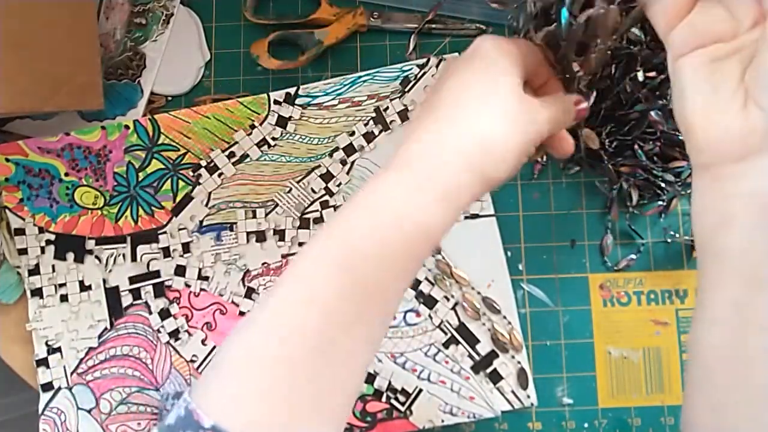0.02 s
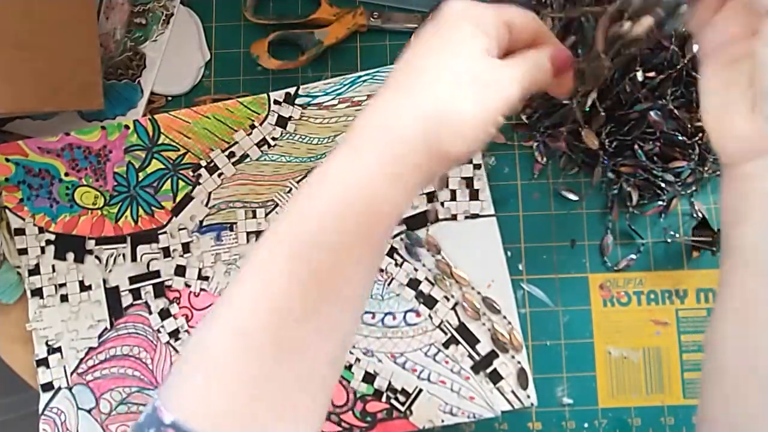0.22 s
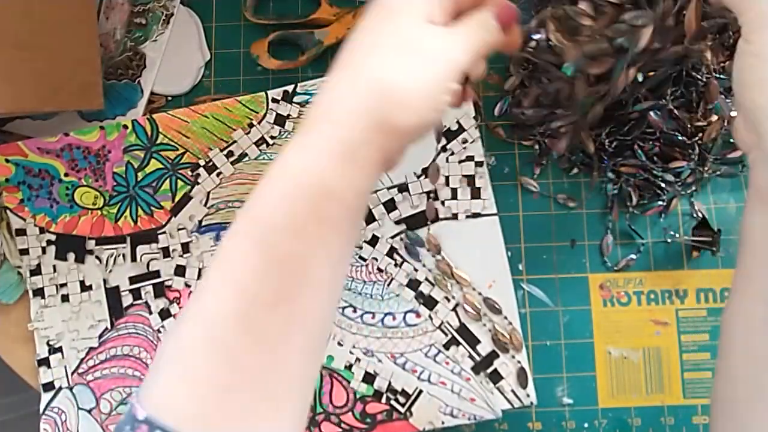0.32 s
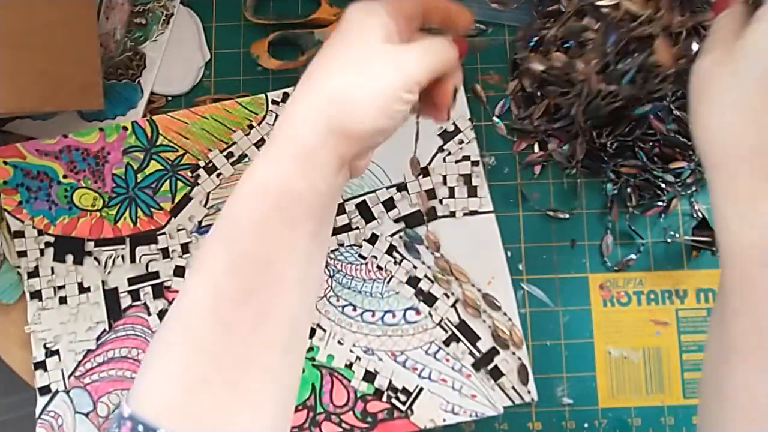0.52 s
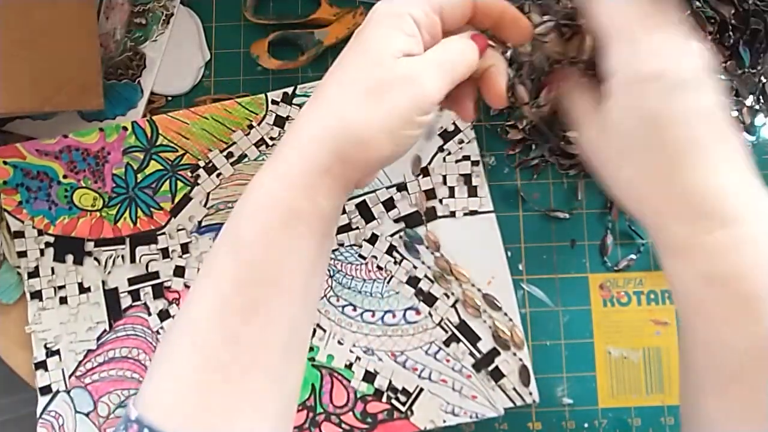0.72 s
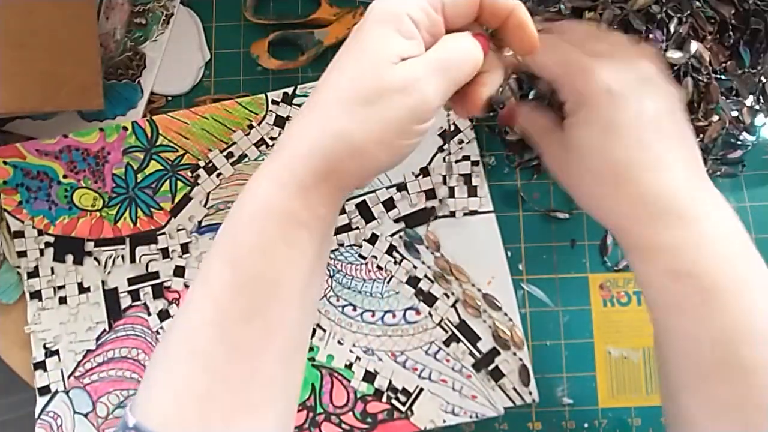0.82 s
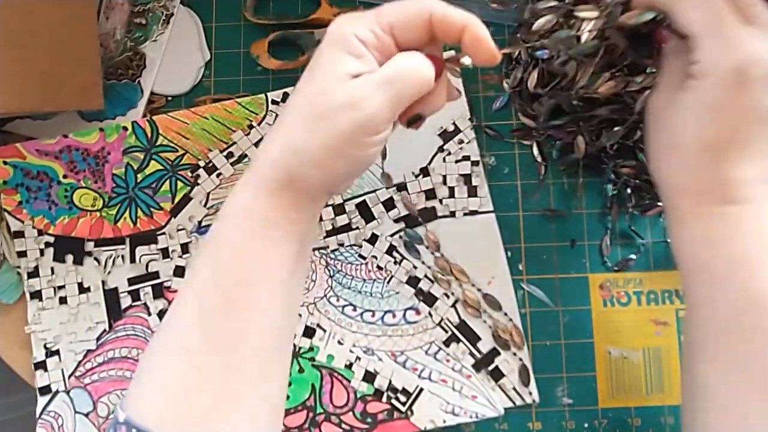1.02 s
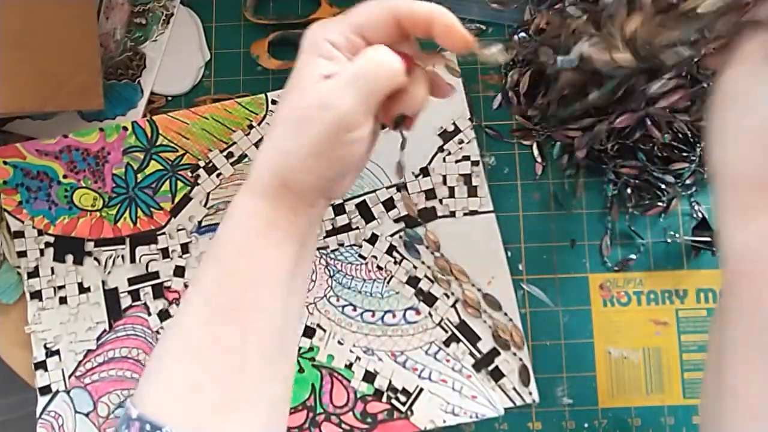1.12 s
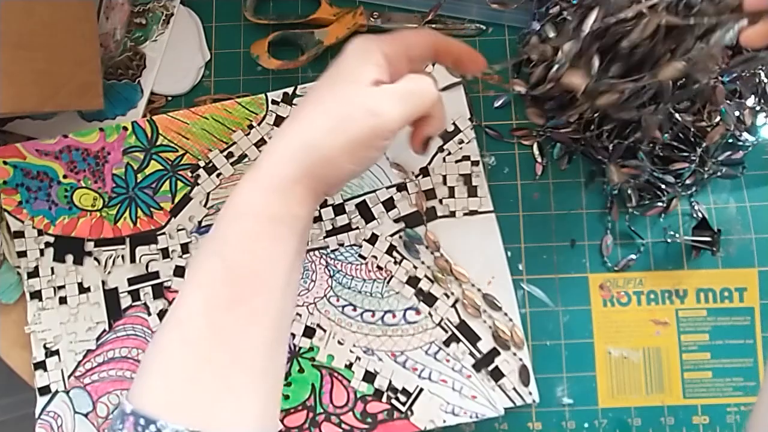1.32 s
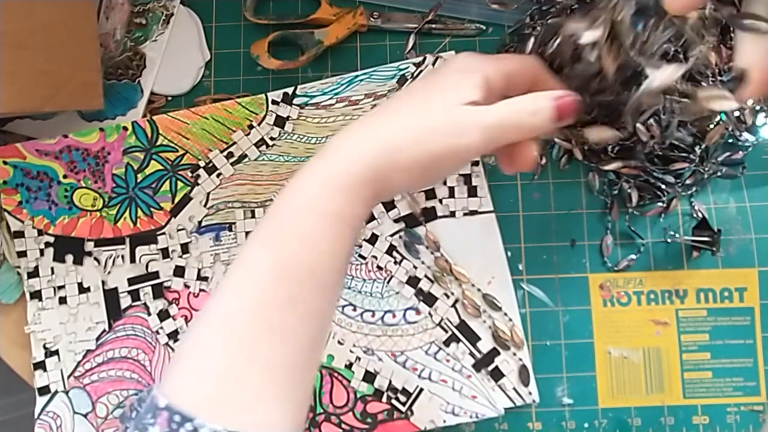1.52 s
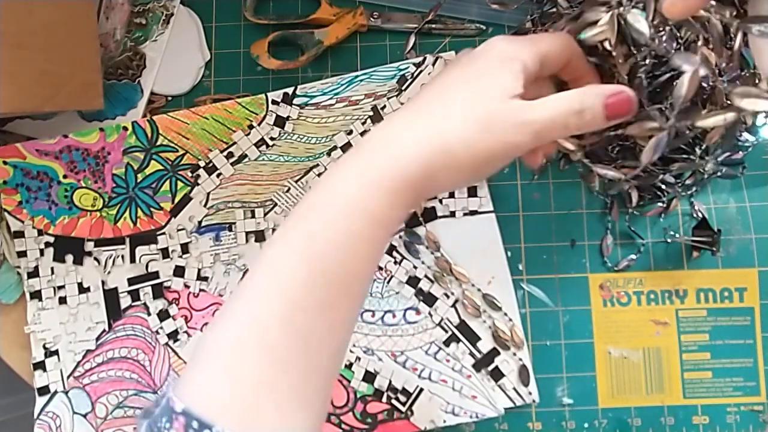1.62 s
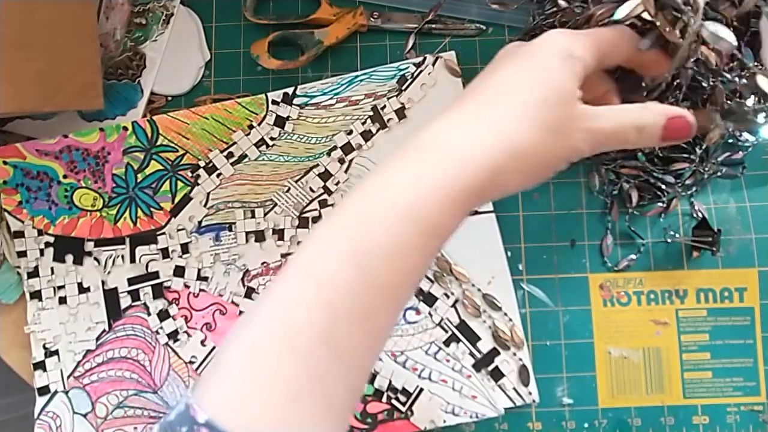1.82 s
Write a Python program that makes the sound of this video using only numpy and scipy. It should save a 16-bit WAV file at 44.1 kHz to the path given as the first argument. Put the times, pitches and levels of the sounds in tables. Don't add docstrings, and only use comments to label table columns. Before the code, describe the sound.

Bright, dry rattling of many tiny beads, swelling as hands stir them on a craft mat

```python
import sys
import numpy as np
from scipy import signal
from scipy.fft import rfft, irfft
from scipy.io import wavfile

SR = 44100
rng = np.random.default_rng(int(sys.argv[2]) if len(sys.argv) > 2 else 0)


def generate_wav(signal):
    frames = np.transpose(np.atleast_2d(signal))
    scaled = np.clip(frames, -1, 1) * 32767
    pcm = np.round(scaled).astype(np.int16)
    wavfile.write(sys.argv[1], SR, pcm)


def volts_from_decibels(level):
    exponent = np.asarray(level, float) / 20
    return 10 ** exponent


N = 81585
TIME_S, BIN_HZ = np.arange(N) / SR, np.arange(N // 2 + 1) * SR / N

LAG_S, LAG_SPREAD_S, PAN_DB, PAN_SPREAD_DB = 0.00021, .00008, -2, -0.5
LEAD = 40


def rms_one(x):
    return x / np.sqrt(np.mean(x ** 2) + 1e-20)


def in_time(rows):
    s, *columns = np.transpose(rows)
    return [np.interp(TIME_S, s, column) for column in columns]


def colour(x, points):
    f, db = np.transpose(points)
    log_hz = np.log(np.maximum(BIN_HZ, 5))
    gain_db = np.interp(log_hz, np.log(f), db, left=db[0] - 44)
    return irfft(rfft(x) * volts_from_decibels(gain_db), N)


def high(x, hz):
    return signal.sosfilt(signal.butter(4, hz, "high", fs=SR, output="sos"), x)


def drift(rate):
    r = np.exp(-2 * np.pi * rate / SR)
    noise = rng.standard_normal(N + SR)
    return rms_one(signal.lfilter([1], [1, -2 * r, r * r], noise)[SR:])


def ring(clicks, hz, t60):
    r = volts_from_decibels(-60 / (t60 * SR))
    w = 2 * np.pi * min(hz, 18000) / SR
    return signal.lfilter([0, np.sin(w)], [1, -2 * r * np.cos(w), r * r], clicks + 1e-18)


def placed(s, strength, where, size=N):
    out = np.zeros((2, size))
    for side, sign in enumerate((1, -1)):
        lag = sign * (LAG_S + LAG_SPREAD_S * where[:, 0]) / 2
        gain = strength * volts_from_decibels(sign * (PAN_DB + PAN_SPREAD_DB * where[:, 1]) / 2)
        at = np.clip((s + lag) * SR, 0, size - 2)
        part = at % 1
        np.add.at(out[side], at.astype(int), gain * (1 - part))
        np.add.at(out[side], at.astype(int) + 1, gain * part)
    return out


def grains(per_s, spread_db, clump_db, low_hz, high_hz, cycles, count):
    uneven_db = spread_db * np.minimum(rng.exponential(1, N), 4.0)
    clumps_db = clump_db * (.25 * drift(40) + drift(120))
    sizes = volts_from_decibels(uneven_db + clumps_db) * rng.choice([-1, 1], N)
    born = rng.random(N) < per_s / SR
    dealt = rng.integers(0, count, N)
    where = rng.standard_normal((N, 2))
    out = 0
    for k, hz in enumerate(np.geomspace(low_hz, high_hz, count)):
        at = np.flatnonzero(born & (dealt == k))
        clicks = placed(at / SR, sizes[at], where[at])
        gain = np.sqrt(hz) / np.sin(2 * np.pi * hz / SR)
        out = out + gain * ring(clicks, hz, cycles / hz) + 2.62 * np.sqrt(high_hz) * clicks
    return out


def lay(out, s, part, db):
    start = int(s * SR) - LEAD
    crest = np.sqrt(np.mean(np.max(part ** 2, axis=1)))
    return np.pad(part * volts_from_decibels(db) / crest, ((0, 0), (start, N)))[:, :N] + out


def room_tone():
    # (frequency [Hz], density [dB per Hz])
    hum_and_hiss = [(25, -15), (48, -3.5), (100, -0.5), (130, -2), (600, -9.5), (900, -25.5), (3000, -7),
                    (15900, -4.5)]
    mid, side = rng.standard_normal((2, N))
    return volts_from_decibels(-66) * rms_one(colour(mid + .5 * side * [[1], [-1]], hum_and_hiss))


def rattle():
    # (time [s], level [dB])
    stirring = [(0, -49), (.04, -77), (.12, -50), (.135, -51), (.225, -40), (.36, -51), (.45, -39.5),
                (.61, -50), (.70, -43), (.775, -29), (.915, -44), (.96, -31), (1.07, -36), (1.255, -41),
                (1.33, -35), (1.635, -44.5), (1.74, -47), (1.85, -57)]
    # (time [s], change [dB], half length [s])
    slips = [(0.02, -3.5, 0.018), (0.075, -1, 0.02), (0.117, -13, 0.0072), (0.308, 5, 0.015),
             (0.38, -1.5, 0.03), (0.461, 4.5, 0.006), (0.481, -5, 0.009), (0.603, -10, 0.011),
             (0.92, 3.5, 0.026), (0.99, 1, 0.034), (1.08, -4, 0.0068), (1.123, 2, 0.044),
             (1.189, 11.5, 0.0028), (1.224, 7.5, 0.0069), (1.243, -2.8, 0.013), (1.329, 3, 0.037),
             (1.533, -4.5, 0.023), (1.571, 5.5, 0.0063), (1.635, -8.5, 0.014), (1.653, 2.5, 0.006),
             (1.766, 5.5, 0.013), (1.791, -15, 0.009)]
    # (time [s], extra balance [dB])
    hands = [
        (0, 1),
        (.25, -2.3),
        (.44, -1.5),
        (.55, 1),
        (.95, -1.5),
        (1.22, -1.3),
        (1.6, .5),
        (1.85, -1),
    ]
    # (frequency [Hz], density [dB per Hz])
    bead_colour = [(2500, -31), (3600, -33), (5200, -27.5), (6500, -12), (10000, -3), (11500, -3.5),
                   (12500, -5), (15900, -8)]
    top_hz, top_follows = 11650, 0.34

    stir_db, = in_time(stirring)
    stir_db = stir_db + sum(db * np.exp(-((TIME_S - s) / half) ** 2) for s, db, half in slips)
    lean_db = in_time(hands)[0] * [[.5], [-.5]]
    ticks = grains(7000, 2.9, 1.4, 3770, 17200, cycles=20, count=90)
    ticks = rms_one(colour(ticks, bead_colour))
    top = irfft(rfft(ticks) * (BIN_HZ > top_hz), N)
    top_gain = volts_from_decibels(top_follows * (stir_db - stir_db.max()))
    return volts_from_decibels(stir_db + lean_db + 3.5) * (ticks + top * (top_gain - 1))


def mat():
    # (time [s], hollow ring [dB], rustle above it [dB])
    dragging = [(0.0, -70.5, 2), (0.082, -84.5, 13.5), (0.2, -56.5, 1), (0.37, -76, 15.5), (0.39, -66, 9.5),
                (0.766, -72.5, 11.5), (0.854, -59.5, 4.5), (0.906, -70.5, 11), (1.01, -61.5, 4),
                (1.06, -71.5, 12.5), (1.23, -64.5, 6.5), (1.256, -71.5, 16), (1.396, -65.5, 12),
                (1.648, -75, 7), (1.71, -56, -1.5), (1.756, -83.5, 21.5), (1.802, -72.5, 12),
                (1.85, -84.5, 15)]
    # (frequency [Hz], density [dB per Hz])
    rustle_colour = [(500, -25.5), (640, -26), (1150, -14), (1700, 0), (2300, 2.5), (5000, 8.5),
                     (7000, -10)]
    # (time [s], peak [dB])
    thump_hits = [(0.195, -51), (0.39, -50.5), (0.499, -56), (0.925, -54), (0.983, -53), (1.001, -57.5),
                  (1.112, -56), (1.188, -54), (1.211, -48), (1.225, -52.5), (1.403, -46.5), (1.473, -49),
                  (1.602, -53.5), (1.69, -52), (1.706, -48.5), (1.79, -61)]
    # (frequency [Hz], level [dB], t60 [s])
    table_body = [(398, -17, 0.04), (646, -8, 0.0096)]
    hollow_modes_hz, hollow_t60_s = (860, 925, 1010), .038

    hollow_db, rustle_db = in_time(dragging)
    rustle = rms_one(colour(grains(5000, 2.0, 1.5, 600, 5500, cycles=12, count=16), rustle_colour))

    soft = signal.butter(3, [810, 1070], "band", fs=SR, output="sos")
    taps = grains(700, 2.5, 2.0, 800, 1000, cycles=3, count=2)
    taps = signal.sosfilt(soft, taps[1] + 1.8 * taps)
    hollow = rms_one(sum(ring(taps, hz, hollow_t60_s) for hz in hollow_modes_hz))

    s, db = np.transpose(thump_hits)
    thumps = placed(s, volts_from_decibels(db - 3.5), np.tile([-1.5, 0], (len(s), 1)))
    soft_thumps = signal.sosfilt(soft, thumps)
    struck = sum(ring(soft_thumps, hz, hollow_t60_s) for hz in hollow_modes_hz)
    body = sum(volts_from_decibels(level_db) * ring(thumps, hz, t60) for hz, level_db, t60 in table_body)
    body = signal.sosfilt(signal.butter(2, [200, 900], "band", fs=SR, output="sos"), body)
    return volts_from_decibels(hollow_db) * (hollow + volts_from_decibels(rustle_db) * rustle) + struck + body


def reflections(x):
    t60_s, changes_per_s = 0.089, 45
    t = np.arange(SR // 4) / SR
    turn = TIME_S * np.pi / 2 * changes_per_s
    dull = signal.butter(1, 20000, fs=SR, output="sos")
    tails = rng.standard_normal((6, 2, len(t))) * volts_from_decibels(-60 * t / t60_s) * (t > .0015)
    out = 0
    for k, tail in enumerate(tails):
        tail = signal.sosfilt(dull, tail)
        tail = tail / np.sqrt(np.sum(tail ** 2) / 2)
        off = (turn - k * np.pi / 2 + 3 * np.pi / 2) % (3 * np.pi) - 3 * np.pi / 2
        share = np.cos(np.clip(off, -np.pi / 2, np.pi / 2))
        send = share * x.mean(axis=0)[None]
        out = out + signal.fftconvolve(tail, send, axes=1)[:, :N]
    return out


def knocks():
    # (time [s], peak [dB], pitch [Hz])
    bead_knocks = [(0.0479, -49, 9600), (0.1631, -37, 9300), (0.1778, -30, 9200), (0.1928, -32, 8600),
                   (0.203, -29, 10900), (0.2225, -28, 11500), (0.2434, -29, 11400), (0.274, -30, 9900),
                   (0.2819, -28, 10100), (0.2944, -30, 11800), (0.3012, -31, 10200), (0.3123, -25, 10300),
                   (0.3186, -32, 10000), (0.3624, -33, 10400), (0.3783, -34, 10000), (0.4021, -33, 9900),
                   (0.4343, -27, 9400), (0.469, -27, 10000), (0.4939, -32, 10700), (0.501, -30, 6700),
                   (0.5751, -35, 10200), (0.6148, -41, 11400), (0.7196, -26, 10900), (0.7245, -23, 9300),
                   (0.752, -19, 8900), (0.7885, -16, 12100), (0.8062, -20, 11100), (0.8581, -24, 8500),
                   (0.9125, -26, 9700), (0.9506, -14, 9900), (0.9615, -21, 10600), (0.971, -16, 11800),
                   (0.9858, -18, 11200), (0.9933, -19, 9900), (1.0642, -25, 10500), (1.1007, -15, 11600),
                   (1.1189, -22, 10900), (1.1416, -24, 9600), (1.1883, -24, 11500), (1.1933, -23, 10500),
                   (1.2279, -24, 11100), (1.2406, -26, 7800), (1.2518, -29, 9900), (1.2769, -23, 8800),
                   (1.3171, -21, 10800), (1.3588, -23, 11000), (1.3851, -25, 8700), (1.4121, -21, 10400),
                   (1.4685, -24, 11200), (1.5032, -29, 9600), (1.5751, -28, 10300), (1.6023, -32, 9600),
                   (1.652, -30, 10100), (1.6908, -35, 8400), (1.7354, -30, 9700), (1.7733, -29, 10900),
                   (1.7821, -37, 10900), (1.813, -41, 8700), (1.8223, -39, 10900), (1.8332, -41, 8500)]
    cycles, gap_s, fade_db = 22, .0004, 4.0
    touch = np.arange(3)
    out = 0
    for (s, db, hz), draw in zip(bead_knocks, rng.standard_normal((len(bead_knocks), 8))):
        spot = np.tile([(2 / hz - LAG_S) / LAG_SPREAD_S, .4 * draw[7]], (3, 1))
        at = LEAD / SR + touch * gap_s * (1 + 0.264 * draw[:3])
        strength = volts_from_decibels(2.6 * draw[3:6] - fade_db * touch) * np.sign(draw[:3])
        clicks = placed(at, strength, spot, size=700)
        part = 0
        for ratio, ratio_db in ((1.07, 7), (0.67, -15), (1.34, -4.5)):
            part = part + volts_from_decibels(ratio_db) * ring(clicks, hz * ratio, cycles / hz)
        out = lay(out, s, high(part, 6570), db + 2.0)
    return out


def drops():
    # (time [s], peak [dB], run length [s], centre [Hz])
    strand_drops = [(0.174, -51.5, .004, 3000), (0.192, -38.5, .004, 3450), (.265, -43.5, .005, 4200),
                    (0.334, -39.5, .002, 3770), (.391, -40, 0.0054, 2030), (.392, -42, .004, 3540),
                    (.402, -42, .010, 2350), (.403, -40, .006, 3670), (.441, -44, 0.007, 2740),
                    (0.499, -48, .008, 1880), (0.503, -39.5, .003, 4630), (0.539, -53, 0.0044, 1730),
                    (0.9183, -42, .002, 2790), (.9238, -53, .010, 2080), (1.088, -48, .005, 2320),
                    (1.213, -47.5, 0.0094, 2480), (1.2255, -35.5, 0.00189, 3940),
                    (1.226, -40.5, .010, 2220), (1.3764, -40, 0.0092, 2400), (1.377, -43, 0.0088, 1390),
                    (1.396, -36, .005, 2270), (1.4045, -30, 0.0048, 2070), (1.405, -36.5, 0.009, 1300),
                    (1.407, -38, .008, 3600), (1.408, -32, 0.0067, 2380), (1.418, -57, 0.011, 2300),
                    (1.47, -43.5, 0.0068, 2120), (1.482, -46.5, .012, 1900), (1.537, -39, 0.0041, 1880),
                    (1.603, -46, .005, 3530), (1.652, -32, .004, 4970), (1.6527, -37, 0.0043, 1910),
                    (1.659, -39.5, 0.016, 2800), (1.678, -45, .004, 2030), (1.690, -44.5, .009, 2370),
                    (1.691, -39, .003, 4700)]
    # (frequency [Hz], level [dB])
    mat_modes = [(1260, -1), (1520, -7), (1700, -3), (1910, 0), (2177, -1), (2420, 1), (2750, 0),
                 (3200, -3), (3786, -2), (4300, 0), (4600, 2), (5200, 2), (5800, 0)]
    lag_s, focus_db, fade_db, cycles, band = .00005, 25, 13, 45, 1.45
    step = np.arange(6) / 5
    spot = np.tile([(lag_s - LAG_S) / LAG_SPREAD_S, 0], (6, 1))
    draws = rng.standard_normal((len(strand_drops), 6, 1 + len(mat_modes)))
    out = 0
    for (s, db, length, centre), draw in zip(strand_drops, draws):
        at = LEAD / SR + abs(length) * step * (1 + 0.1468 * draw[:, 0])
        part = 0
        for (hz, level_db), chance in zip(mat_modes, draw.T[1:]):
            off_centre_db = focus_db * np.log2(hz / centre) ** 2
            strength = volts_from_decibels(level_db - fade_db * step - off_centre_db + 3.4 * chance) * np.sign(chance)
            part = part + ring(placed(at, strength, spot, size=2500), hz, cycles / hz)
        out = lay(out, s, high(part, centre / band), db - 0.5)
    return out


def slide():
    from_s, to_s, fade_s = .495, .73, 0.0089
    taps = grains(900, 2.5, 1.5, 1500, 1900, cycles=3, count=2)
    rub = high(sum(ring(taps, hz, .03) for hz in (1530, 1810)), 1400)
    fade = np.clip(np.minimum(TIME_S - from_s, to_s - TIME_S) / fade_s, 0, 1)
    return volts_from_decibels(-62.5) * rms_one(rub) * fade


def bump():
    touch = placed(np.array([.970]), 1, np.zeros((1, 2)))
    return volts_from_decibels(-60.5) * ring(touch, 129, 0.015)


def scene():
    near = rattle() + mat() + knocks() + drops() + slide()
    return near + volts_from_decibels(-3.5) * high(reflections(near), 788) + bump() + room_tone()


def low_pass(x):
    return signal.sosfilt(signal.butter(12, 16700, fs=SR, output="sos"), x)


def record(dry):
    mix = irfft(rfft(dry) * (BIN_HZ < 16000), N)
    return low_pass(mix)


dry = scene()
out = record(dry)
generate_wav(out)
```